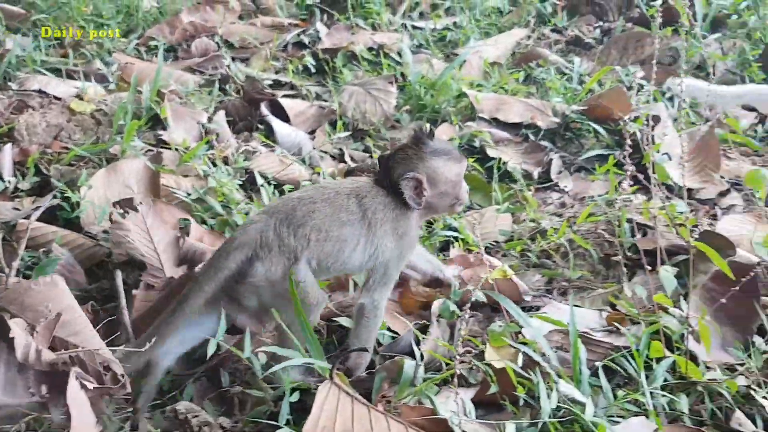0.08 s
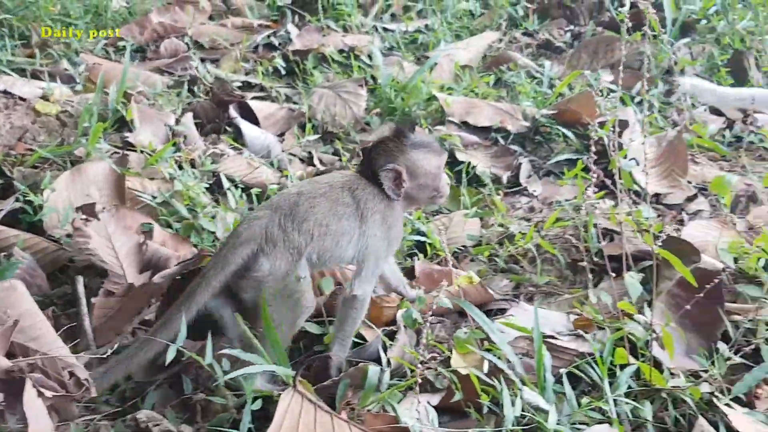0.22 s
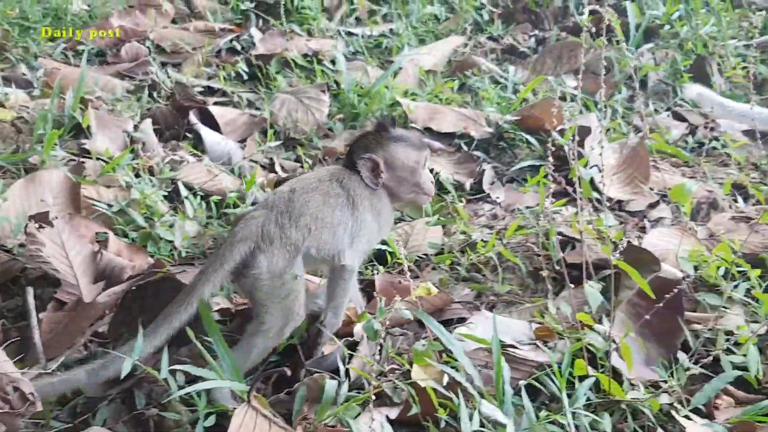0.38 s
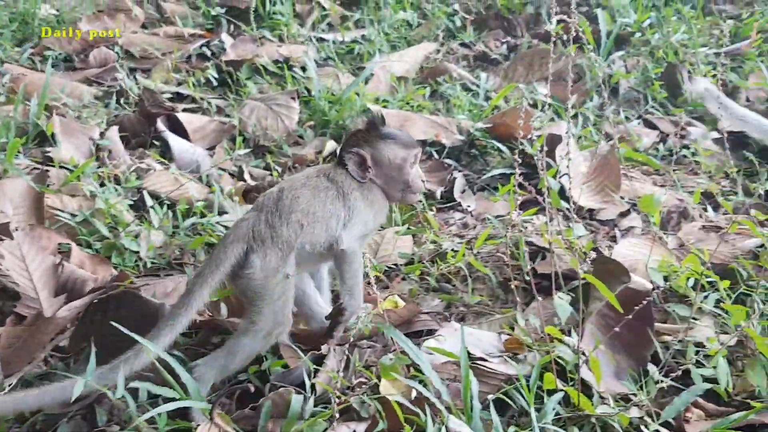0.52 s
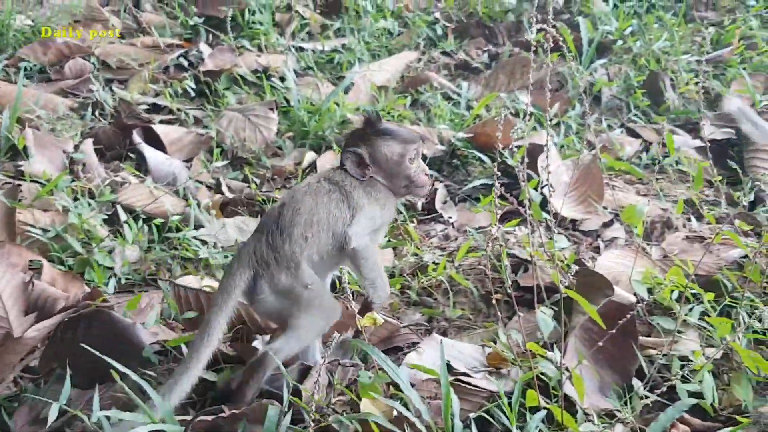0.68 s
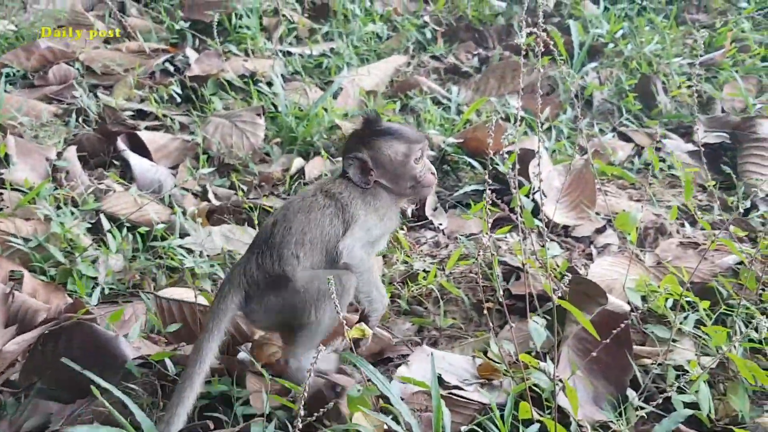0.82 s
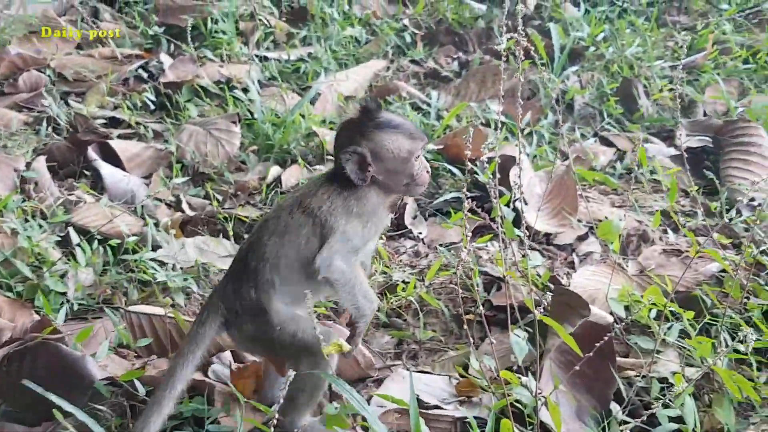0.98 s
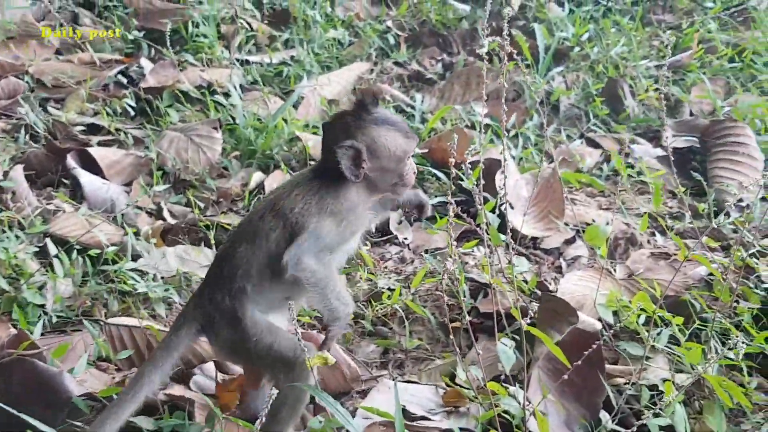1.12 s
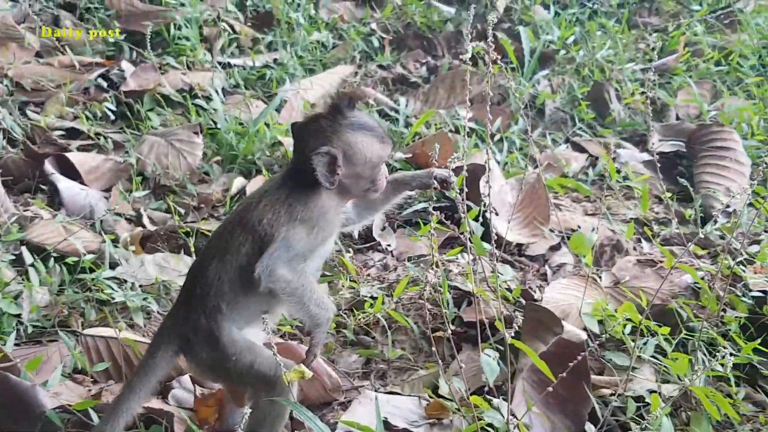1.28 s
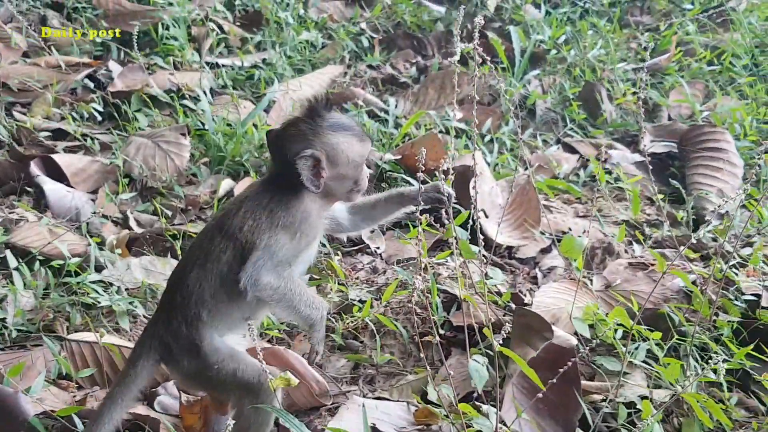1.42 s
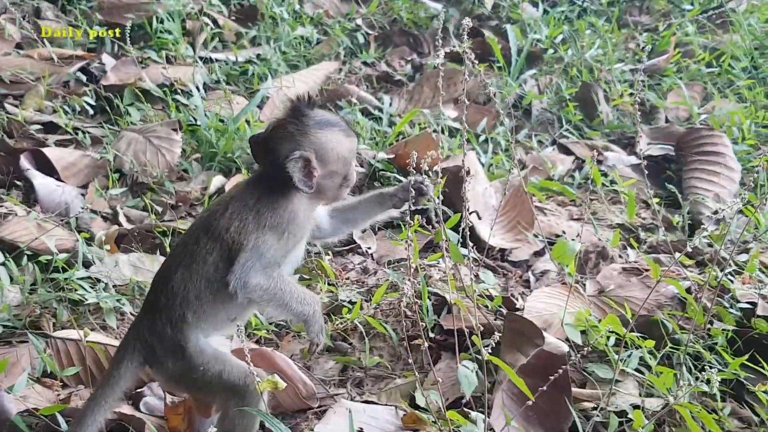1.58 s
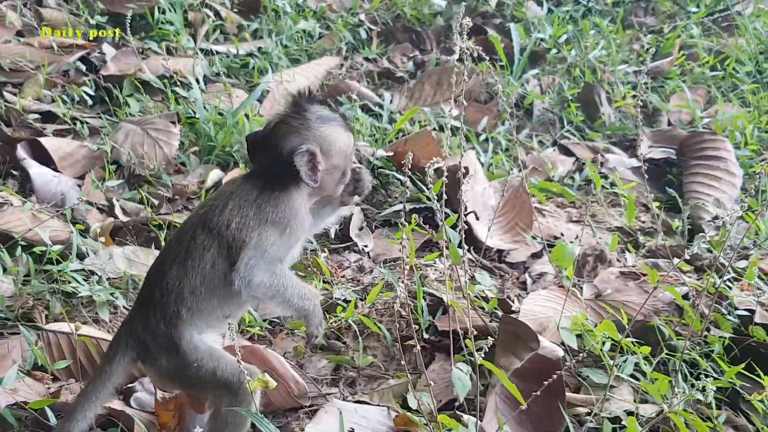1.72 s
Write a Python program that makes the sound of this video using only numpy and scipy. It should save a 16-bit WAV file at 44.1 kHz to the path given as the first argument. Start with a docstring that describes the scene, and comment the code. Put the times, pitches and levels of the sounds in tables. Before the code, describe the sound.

Dry leaves crackle under a small monkey's feet, close up outdoors. Nearly quiet at first with a light tick, rustling begins around 0.2 s and thickens into crisp crunches and pops from 0.4 s. A stem snaps very loudly at 0.66 s, short and woody. Crackling continues to 0.9 s, bursts again at 1.0-1.1 s, then fades to sparse faint rustles until 1.8 s, over a faint distant wash.

```python
"""Dry leaf litter under the shifting feet of a small monkey, close by, outdoors.
Leaves pop and ring as short wavelets with noise cracks and ticks; crunch is dense random wavelets, fizz clicks.
One stem snaps loudly: sharp clicks, each with a decaying woody ring. Dull thuds are low wavelets.
A faint distant wash of random spectra lies under it. Two microphone ports differ in phase and balance."""
import sys
import numpy as np
from scipy import signal
from scipy.fft import rfft, irfft, next_fast_len
from scipy.io import wavfile
from scipy.ndimage import uniform_filter1d

SR = 44100
rng = np.random.default_rng(int(sys.argv[2]) if len(sys.argv) > 2 else 0)


def inscribe(sig):
    """Save sig as 16-bit PCM at rate SR to the path in sys.argv[1].

    A 1-D sig is mono; a 2-D sig holds one channel per row.
    Samples are clipped to [-1, 1] before scaling.
    """
    pcm = np.round(np.clip(np.atleast_2d(sig).T, -1, 1) * 32767)
    wavfile.write(sys.argv[1], SR, pcm.astype(np.int16))


def nominal_scale(level):
    """Amplitude ratio for a level in decibels (scalar or array-like)."""
    x = np.asarray(level, float) / 20
    return 10 ** x


N = 79380

# Source levels are ahead of the ports and the low cut; colours are shapes, in dB per Hz.
# Distant wash: hz, colour_db
WASH_COLOUR = [(18, -60), (30, -27), (40, -11.5), (50, -2), (70, -6.5), (115, -3), (160, -10), (480, -12.5),
               (1220, -16), (1700, -15.5), (2100, -24), (4000, -26.5), (8500, -36.5), (12200, -30),
               (15500, -36.5), (16500, -53)]
# Random level patches in the wash: hz, patch_rms_db
WASH_PATCHES = [(60, -1), (300, 1.3), (1000, 3)]
# Likeness of the wash at the two ports: hz, correlation_ratio
PORT_LIKENESS = [(60, 1), (130, 0.93), (290, 0.77), (640, 0.17), (1400, 0.0086), (15000, 0.014)]
WASH_RMS_DB = -58.5

# Litter under the feet: time_s, low_crunch_db, high_crunch_db, fizz_db
LITTER_LEVELS = [(0, -93, -62, -93), (0.025, -72, -80, -62.5), (0.045, -62, -55.5, -63),
                 (0.07, -69, -67.5, -67), (0.12, -61.5, -60.5, -62), (0.19, -60.5, -65.5, -62.5),
                 (0.2, -56, -56.5, -55.5), (0.235, -52, -54, -49), (0.262, -55.5, -56.5, -52),
                 (0.28, -60, -63, -64.5), (0.345, -57, -64.5, -66), (0.357, -54.5, -55.5, -56),
                 (0.39, -60, -57, -60), (0.41, -47, -50.5, -54), (0.43, -53.5, -54.5, -57.5),
                 (0.445, -48, -48, -51), (0.472, -52.5, -50.5, -59.5), (0.49, -54, -58, -62.5),
                 (0.53, -53.5, -54, -60.5), (0.545, -45, -52.5, -53.5), (0.58, -50.5, -50, -54),
                 (0.6, -49.5, -51, -56.5), (0.63, -49.5, -51.5, -53.5), (0.65, -45, -59, -68),
                 (0.672, -51, -45.5, -46), (0.7, -50, -52, -53.5), (0.74, -49.5, -51.5, -50),
                 (0.775, -46, -47.5, -48), (0.81, -54, -53, -53.5), (0.83, -52, -57, -56),
                 (0.86, -55, -57, -57.5), (0.9, -60, -63, -62.5), (0.95, -57, -52.5, -59.5),
                 (0.975, -58.5, -60.5, -59), (1.01, -49, -52.5, -55.5), (1.05, -56, -58, -56),
                 (1.075, -53, -53, -54), (1.103, -62, -53.5, -53.5), (1.118, -71, -69, -63),
                 (1.16, -73, -67, -74), (1.22, -57, -64, -61.5), (1.27, -65.5, -69, -67.5),
                 (1.295, -61.5, -64, -56.5), (1.33, -64.5, -66, -65), (1.4, -64.5, -67.5, -69.5),
                 (1.46, -78, -76, -82), (1.55, -71, -75, -95), (1.62, -65, -74, -95),
                 (1.7, -63, -72.5, -73), (1.76, -57.5, -69, -70), (1.8, -59.5, -69, -71)]
# Crunch grains: hz, colour_db
CRUNCH_COLOUR = [(150, -46), (250, -7.5), (593, -9), (784, -6.5), (1110, -8), (1640, -2), (2020, -8.5),
                 (2950, -9.5), (3580, -12), (7000, -19.5), (9100, -47), (15400, -120)]
# Leaf edges, fizzing or ticking: hz, colour_db
EDGE_COLOUR = [(3500, -39), (6000, -8), (8700, -4.5), (11000, -4.5), (12500, -2.5), (14300, -10.5),
               (15800, -6), (16500, -43)]
GRAINS_PER_S, GRAIN_SPREAD_DB, GRAIN_CYCLES, SPLIT_HZ = 4800, 3.2, 4.0, 2500  # per patch
FIZZ_PER_S, FIZZ_SPREAD_DB = 4000, 4.2  # per patch

# Single leaves popping: peak_s, pitch_hz, pop_db, crack_db, tick_db
POPS = [(0.0355, 357, -81, -38.5, -49), (0.198, 986, -44.5, -41, -43), (0.2062, 490, -45, -61, -42),
        (0.267, 745, -39.5, -53, -58), (0.3167, 1880, -48, -43, -43.5), (0.3572, 2240, -44.5, -50, -33),
        (0.403, 1430, -48, -56, -55), (0.4167, 1530, -32.5, -34, -44), (0.423, 1240, -36.5, -43, -53),
        (0.437, 1470, -40, -46, -47), (0.4488, 1340, -36.5, -35, -51), (0.456, 1697, -35, -59, -54),
        (0.4595, 2230, -41, -42, -36), (0.469, 2740, -61, -35.5, -48), (0.477, 1540, -42.5, -52, -60),
        (0.5437, 1150, -41, -55, -53), (0.553, 1610, -42, -39, -43), (0.576, 1640, -29, -33, -29.5),
        (0.5883, 1400, -35, -52, -31.5), (0.6382, 1380, -34.5, -39, -40), (0.7743, 1920, -34.5, -53, -40),
        (0.7814, 1450, -41, -46, -39), (0.7911, 945, -38.5, -26, -37), (0.8082, 1760, -38, -48, -40),
        (0.9833, 3530, -60, -59, -58), (1.0015, 1230, -34, -38, -55), (1.028, 2905, -42, -52, -48),
        (1.0413, 1260, -38.5, -38, -28.5), (1.057, 2820.0, -52, -51, -46), (1.073, 3200, -41, -50, -47),
        (1.081, 3250, -41.5, -52, -50), (1.0922, 1580, -38, -41, -33.5), (1.1048, 1640, -46.5, -43, -51),
        (1.1735, 1710, -44.5, -59, -60), (1.2042, 1130, -60, -67, -62), (1.2476, 1170, -49, -46, -46),
        (1.286, 920, -48, -52, -57), (1.6067, 800.0, -51, -68, -64), (1.649, 886, -54, -68, -67),
        (1.667, 830.0, -49.5, -62, -70), (1.7132, 1520, -49, -64, -68), (1.7563, 1560, -49, -43.5, -39),
        (1.7759, 850, -46, -58, -64)]
# Brittle edges ticking: peak_s, peak_db
TICKS = [(0.0858, -41.5), (0.3635, -35), (0.374, -39), (0.4025, -47), (0.4257, -44), (0.4463, -40),
         (0.7337, -41), (0.7469, -39), (0.7966, -40), (0.827, -43), (0.8324, -35), (0.8505, -34),
         (0.871, -39), (0.895, -37.5), (1.1415, -50), (1.191, -38), (1.259, -39), (1.297, -45.5),
         (1.678, -50)]
# Thin curled leaves ringing, no crack: peak_s, pitch_hz, peak_db
RINGS = [(0.2031, 990, -43.5), (.2065, 1700, -48), (0.364, 4150, -46), (0.3756, 1750, -45),
         (0.4117, 1900, -49), (.4165, 3640, -43), (0.4379, 5300, -40), (0.4523, 4700, -36),
         (0.4668, 2700, -43), (0.4697, 1560, -45), (0.472, 4300, -49), (0.5493, 4190, -36.5),
         (0.5532, 3414, -43), (0.5583, 1100, -37.5), (0.5703, 1530, -42), (0.5749, 2800, -34.5),
         (.5765, 4490, -46), (0.582, 1600, -38), (.588, 2830, -36), (0.5966, 1500, -42), (.612, 1500, -40),
         (.6165, 1505, -40.5), (.626, 1283, -42), (0.6465, 1540, -53), (1.0015, 750, -42.5),
         (1.0015, 5460, -40), (1.0403, 3220, -40.5), (1.0732, 1500, -48), (1.0768, 3310, -37),
         (1.088, 3130, -41), (1.0925, 5980, -39), (1.0955, 3200, -47), (1.2447, 3300, -44.5),
         (1.2468, 2200, -50), (1.2865, 5700, -48), (1.2886, 4740, -50), (1.297, 3500, -52),
         (1.2975, 5360, -48.5), (1.315, 4550, -51), (1.601, 2290, -55), (1.6775, 900, -54)]
# Leaf crack: hz, colour_db
CRACK_COLOUR = [(700, -40), (1400, -6), (3000, 0), (4800, -2), (6500, -9), (9000, -40)]
POP_CYCLES_AT_1KHZ, POP_RISE_CYCLES, POP_SPREAD_S, POP_DETUNE_LOG = 3.0, 1.0, 0.0011, 0.08
CRACK_DECAY_S = 0.0007

# Stem: first splinter, break, second break: start_s, click_peak_db
BREAKS = [(.6580, -24), (.6596, -6), (.6635, -17)]
# Stem click: hz, colour_db
BREAK_COLOUR = [(300, -31), (520, -3.5), (2100, 7.5), (2900, 3), (3600, 0), (4700, 10), (5500, 3.5),
                (7000, -2), (9500, -6), (11200, 2), (12300, 4.5), (14000, -10), (16000, -17),
                (16800, -18.5)]
# Stem partials at the loudest break: pitch_hz, level_db, t60_s
STEM_PARTIALS = [(655, -37, 0.051), (1184, -34, 0.052), (1475, -30, 0.011), (2000, -51, .022),
                 (2290, -28, 0.017), (3110, -25.5, 0.0055)]

# Feet meeting the soil: peak_s, pitch_hz, peak_db
THUDS = [(.735, 115, -57), (0.774, 124, -51), (0.927, 134, -55), (1.0037, 445, -43.5), (1.192, 105, -56.5),
         (1.302, 114, -54.5), (1.7, 325, -51.5)]
THUD_CYCLES, THUD_RISE_CYCLES = 2.3, 0.76

# Phase by which the left port leads: hz, lead_rad
PORT_LEAD = [(0, 0), (1000, .3), (1900, 1.3), (5000, 1.5), (8300, 2.9), (10500, 4.3), (12500, 5.3),
             (16700, 6.3)]
# Port balance for litter: hz, left_minus_right_db
LITTER_TILT = [(700, 0), (1290, -3.5), (2380, 3), (4400, 3), (8120, 1), (15000, 0)]
# Port balance for the stem: hz, left_minus_right_db
STEM_TILT = [(700, 1), (1500, 0), (2500, 2.5), (4500, 2), (8500, -10.5), (13000, 0)]
# Litter patches: extra_left_lead_s
PATCH_LEADS_S = [-.00009, -.000015, .000015, .0001]
SINGLE_PATCHES = 3  # single leaves use only the first patches, whose leads keep the pitches clear
SCATTER_DB, SCATTER_T60_S, SCATTER_LOW_CUT_HZ = -13, 0.03, 900
LOW_CUT_HZ = 383  # keeps wavelet offset and rumble out of leaves and stem


def read(points, hz):
    """Interpolates a table on a log-frequency axis."""
    f, value = np.transpose(points)
    return np.interp(np.log(hz + 1), np.log(f + 1), value)


def litter_gain(column):
    """Gain over time from one dB column of the litter levels."""
    columns = np.transpose(LITTER_LEVELS)
    return nominal_scale(np.interp(np.arange(N) / SR, columns[0], columns[column]))


def evened(x):
    """Scales to rms 1."""
    return x / np.sqrt(np.mean(x ** 2) + 1e-20)


def peaked(x):
    """Scales to peak 1."""
    return x / abs(x).max()


def add(mix, start_s, sound):
    """Mixes a sound in from start_s."""
    part = mix[round(start_s * SR):][:len(sound)]
    part += sound[:len(part)]


def add_centred(mix, peak_s, sound):
    """Mixes a sound in with its loudest sample at peak_s."""
    add(mix, peak_s - abs(sound).argmax() / SR, sound)


def coloured_click(colour, size=2048):
    """Minimum-phase click of a given colour, peak 1."""
    hz = abs(np.fft.fftfreq(size, 1 / SR))
    log_gain = np.log(nominal_scale(np.maximum(read(colour, hz), -70)))
    spectrum = np.exp(np.conj(signal.hilbert(log_gain)))
    return peaked(np.fft.ifft(spectrum).real[:size // 2])


def sparse_clicks(per_s, spread_db):
    """Random clicks of either sign; a few are large."""
    chance = rng.random(N)
    size = np.minimum(rng.exponential(1, N), 4)
    sign = rng.choice([-1., 1.], N)
    return (chance < per_s / SR) * nominal_scale(spread_db * size) * sign


def wavelet(hz, cycles, rise_cycles):
    """A few cycles that swell and die, peak 1."""
    u = np.arange(int(SR * 4 * cycles / hz) + 8) * hz / SR  # elapsed cycles
    envelope = (1 - np.exp(-u / rise_cycles)) * np.exp(-2 * u / cycles)
    return peaked(envelope * np.sin(2 * np.pi * u))


def ports(x, tilt, lead_s=0):
    """One source at two ports: phase and balance vary with frequency, split evenly between them."""
    size = next_fast_len(N + 512)
    hz = np.fft.rfftfreq(size, 1 / SR)
    lead_rad = np.interp(hz, *np.transpose(PORT_LEAD)) + 2 * np.pi * hz * lead_s
    half = nominal_scale(read(tilt, hz) / 2) * np.exp(0.5j * lead_rad)
    return irfft(rfft(x, size) * np.array([half, 1 / half]), size)[:, :N]


def wash():
    """Distant air: random short-time spectra with level patches, most alike at both ports in the bass."""
    frames, hz = N // 256 + 5, np.fft.rfftfreq(1024, 1 / SR)
    a, b, c, d, patches = rng.standard_normal((frames, 513, 5)).T
    patches = evened(uniform_filter1d(uniform_filter1d(patches, 10, 0), 10, 1))
    same = np.clip(read(PORT_LIKENESS, hz), -1, 1)[:, None]
    left = a + 1j * b
    right = same * left + np.sqrt(1 - same ** 2) * (c + 1j * d)
    level_db = read(WASH_COLOUR, hz)[:, None] + read(WASH_PATCHES, hz)[:, None] * patches
    spectra = np.array([left, right]) * nominal_scale(level_db)
    sound = signal.istft(spectra, nperseg=1024, noverlap=768)[1][:, :N]
    return nominal_scale(WASH_RMS_DB) * evened(sound)


def crunch():
    """Many small buckles, each a few cycles at a leaf-bit pitch; low and high bands have own levels."""
    train = sparse_clicks(GRAINS_PER_S, GRAIN_SPREAD_DB)
    which = rng.integers(0, 28, N)
    bands = np.zeros((2, N))
    for k, hz in enumerate(np.geomspace(300, 6500, 28)):
        grain = wavelet(hz, GRAIN_CYCLES, 0.66)
        grain = grain / np.linalg.norm(grain) * np.sqrt(hz) * nominal_scale(read(CRUNCH_COLOUR, hz))
        bands[int(hz > SPLIT_HZ)] += signal.oaconvolve(train * (which == k), grain)[:N]
    return litter_gain(1) * evened(bands[0]) + litter_gain(2) * evened(bands[1])


def fizz():
    """Dense tiny clicks of leaf edges scraping as they slide."""
    train = sparse_clicks(FIZZ_PER_S, FIZZ_SPREAD_DB)
    return litter_gain(3) * evened(signal.oaconvolve(train, coloured_click(EDGE_COLOUR))[:N])


def buckle(hz):
    """A leaf gives way in five quick buckles around one pitch, peak 1."""
    out = np.zeros(2000)
    cycles = POP_CYCLES_AT_1KHZ * np.sqrt(hz / 1000)  # higher leaves ring more cycles
    for size, (when, tune) in zip([1, 0.44, -0.22, 0.4, -0.3], rng.standard_normal((5, 2))):
        stray = size < 1  # the main buckle keeps its time and pitch
        pitch_hz = hz * np.exp(POP_DETUNE_LOG * tune * stray)
        add(out, 0.0069 + POP_SPREAD_S * when * stray, size * wavelet(pitch_hz, cycles, POP_RISE_CYCLES))
    return peaked(out)


def splinter(click):
    """Brittle fracture: a tiny decaying noise burst coloured by a click, peak 1."""
    t = np.arange(300) / SR
    return peaked(np.convolve(rng.standard_normal(300) * np.exp(-t / CRACK_DECAY_S), click))


def pops():
    """Single leaves buckle at their own pitch with a crack and a tick, on a random one of the first patches."""
    out = np.zeros((len(PATCH_LEADS_S), N))
    crack_click, edge_click = coloured_click(CRACK_COLOUR), coloured_click(EDGE_COLOUR)
    for peak_s, hz, pop_db, crack_db, tick_db in POPS:
        patch = out[rng.integers(SINGLE_PATCHES)]
        add_centred(patch, peak_s, nominal_scale(pop_db) * buckle(hz))
        add_centred(patch, peak_s, nominal_scale(crack_db) * splinter(crack_click))
        add_centred(patch, peak_s, nominal_scale(tick_db) * splinter(edge_click))
    return out


def scatter(x):
    """Nearby litter and stems throw a short, different spray of echoes to each port."""
    t = np.arange(3000) / SR
    taps = rng.choice([-1., 1.], (2, 3000)) * (rng.random((2, 3000)) < 0.08)
    taps = taps * nominal_scale(-60 * t / SCATTER_T60_S) * (t > 0.0005)
    taps = signal.lfilter(*signal.butter(1, SCATTER_LOW_CUT_HZ, "high", fs=SR), taps)
    taps = taps / np.linalg.norm(taps, axis=1, keepdims=True)
    return nominal_scale(SCATTER_DB) * signal.fftconvolve(x[None], taps, axes=1)[:, :N]


def ticks():
    """Brittle edges fracture alone, each a treble noise burst on a random one of the first patches."""
    out, edge_click = np.zeros((len(PATCH_LEADS_S), N)), coloured_click(EDGE_COLOUR)
    for peak_s, peak_db in TICKS:
        add_centred(out[rng.integers(SINGLE_PATCHES)], peak_s, nominal_scale(peak_db) * splinter(edge_click))
    return out


def rings():
    """Thin curled leaves buckle and ring briefly without a crack."""
    out = np.zeros((len(PATCH_LEADS_S), N))
    for peak_s, hz, peak_db in RINGS:
        add_centred(out[rng.integers(SINGLE_PATCHES)], peak_s, nominal_scale(peak_db) * buckle(hz))
    return out


def stem_snap():
    """Each break of the stem is a sharp click and a short woody ring of decaying partials."""
    out, t = np.zeros(N), np.arange(3000) / SR
    ring = sum(nominal_scale(db - 60 * t / t60_s) * np.sin(2 * np.pi * hz * t) for hz, db, t60_s in STEM_PARTIALS)
    click = coloured_click(BREAK_COLOUR)
    loudest_db = max(db for _, db in BREAKS)
    for start_s, db in BREAKS:
        add(out, start_s, nominal_scale(db) * click)
        add(out, start_s, nominal_scale(db - loudest_db) * ring)
    return -out


def thuds():
    """Dull bumps through the ground, low wavelets alike at both ports."""
    out = np.zeros(N)
    for peak_s, hz, peak_db in THUDS:
        add_centred(out, peak_s, nominal_scale(peak_db) * wavelet(hz, THUD_CYCLES, THUD_RISE_CYCLES))
    return out


def scene():
    """Litter patches and the stem at two ports with scatter and a low cut, plus thuds and wash."""
    singles, stem = pops() + ticks() + rings(), stem_snap()
    litter = np.zeros((2, N))
    for single, lead_s in zip(singles, PATCH_LEADS_S):
        rustle = (crunch() + fizz()) / np.sqrt(len(PATCH_LEADS_S))  # drawn afresh for each patch
        litter += ports(rustle + single, LITTER_TILT, lead_s)
    leaves = litter + ports(stem, STEM_TILT) + scatter(singles.sum(0) + stem)
    low_cut = signal.butter(3, LOW_CUT_HZ, "high", fs=SR, output="sos")
    return signal.sosfilt(low_cut, leaves) + thuds() + wash()


def top_cut(x):
    """Nothing passes above the cut-off."""
    return signal.sosfilt(signal.butter(12, 17140, fs=SR, output="sos"), x)


def record(dry):
    """Delivers the finished two-port mix."""
    return top_cut(dry)


dry = scene()
out = record(dry)
inscribe(out)
```